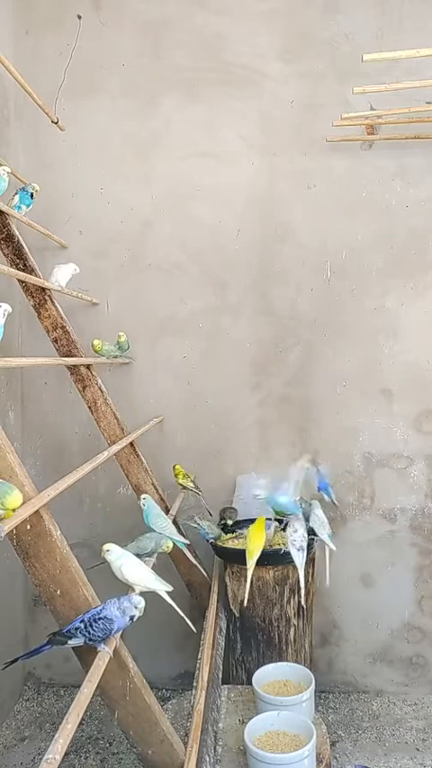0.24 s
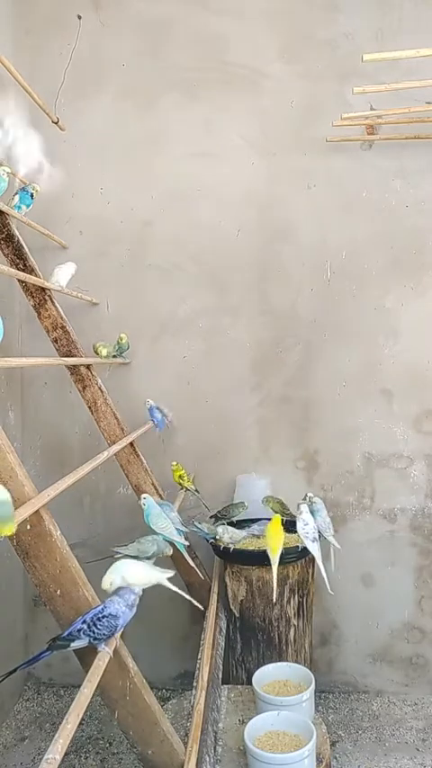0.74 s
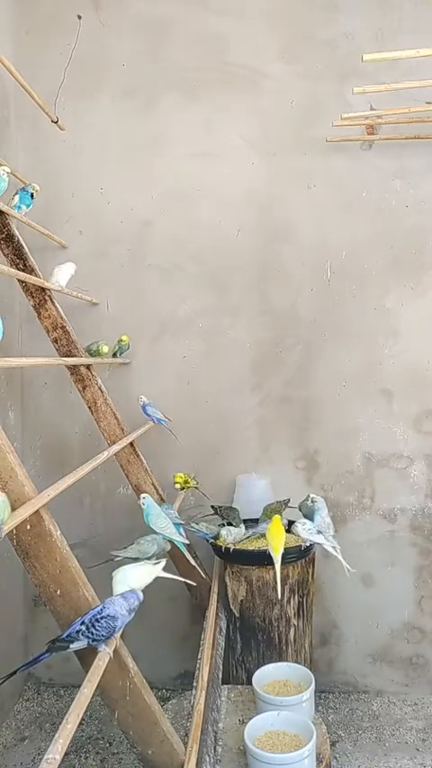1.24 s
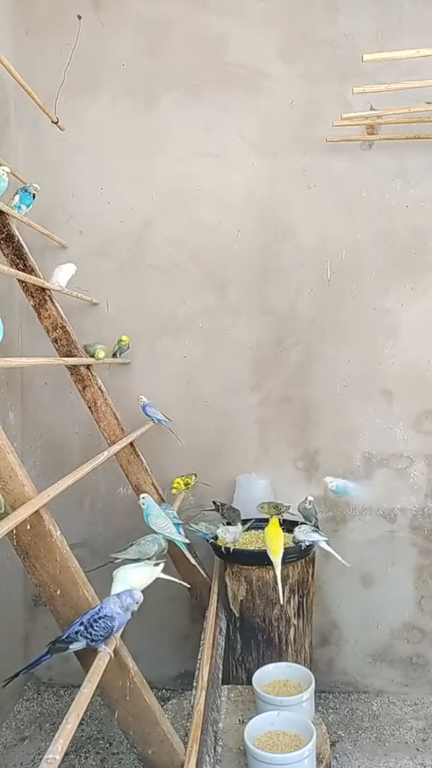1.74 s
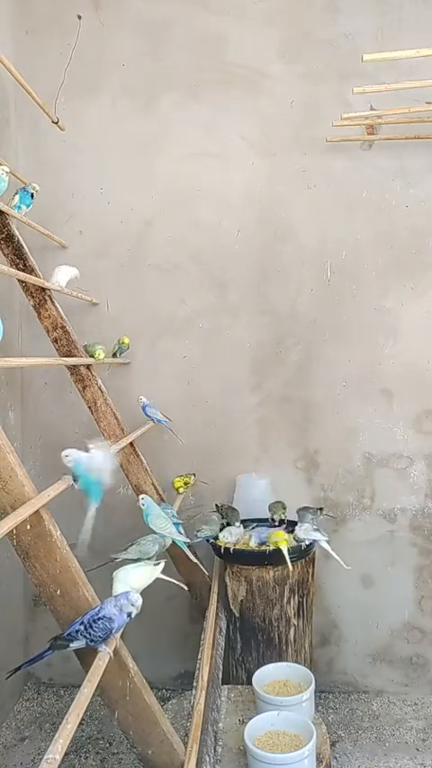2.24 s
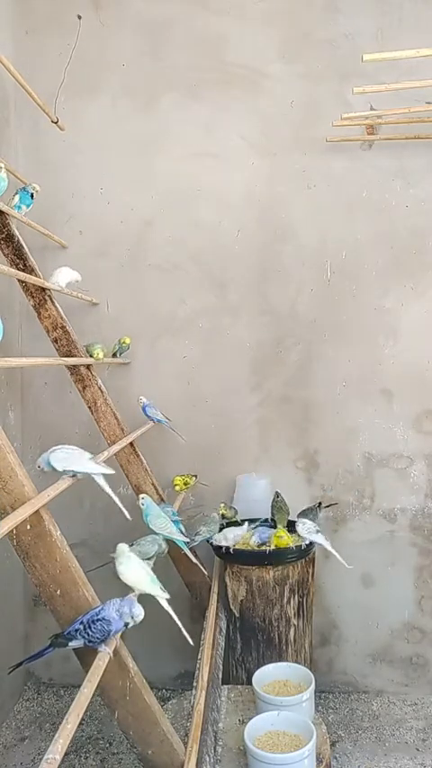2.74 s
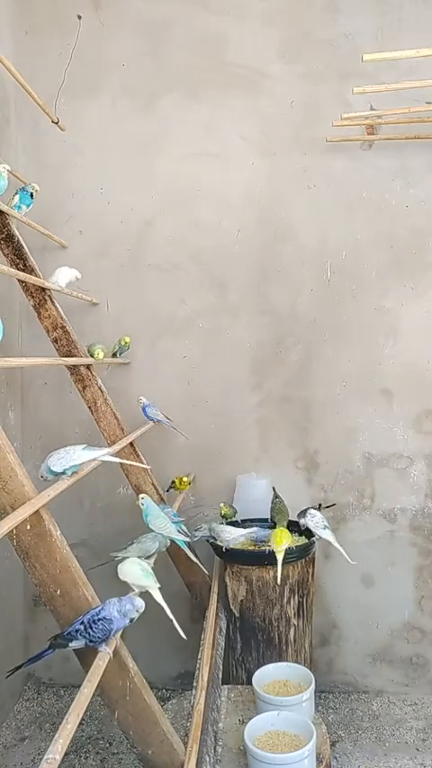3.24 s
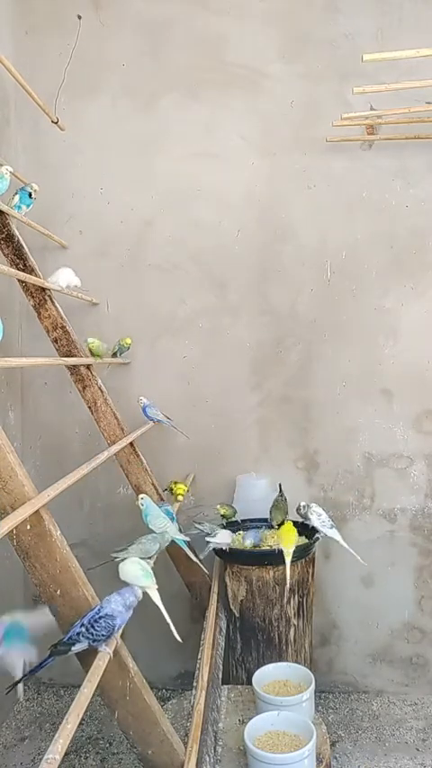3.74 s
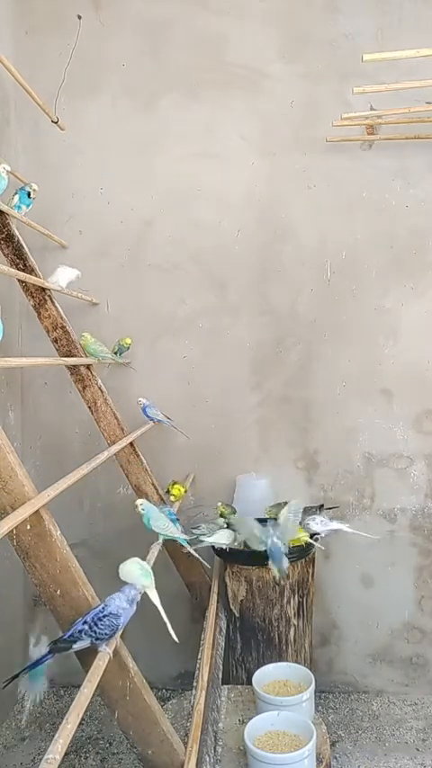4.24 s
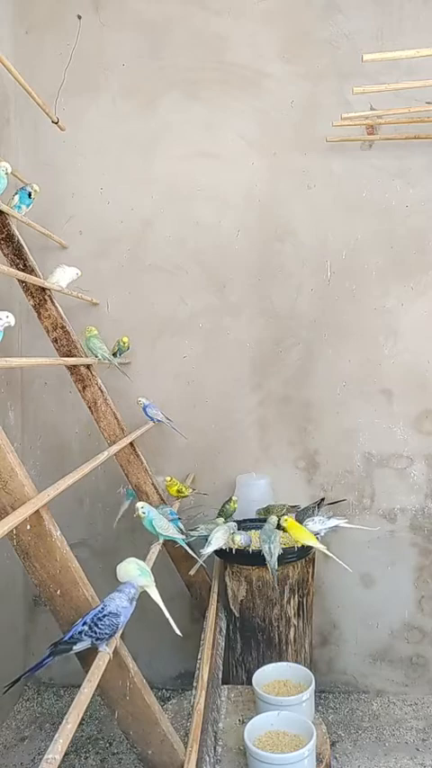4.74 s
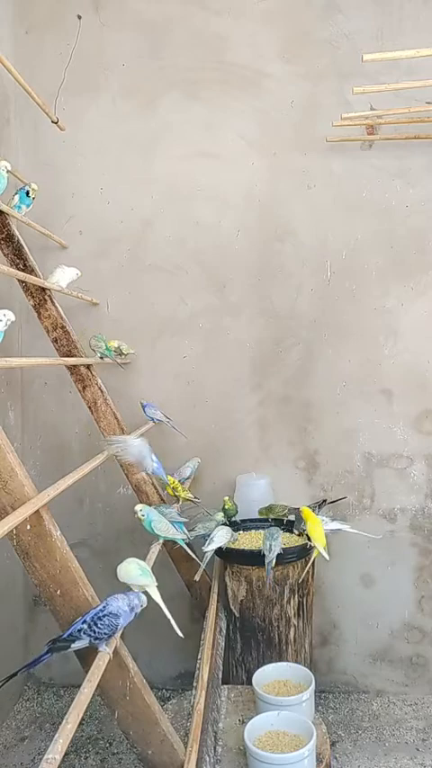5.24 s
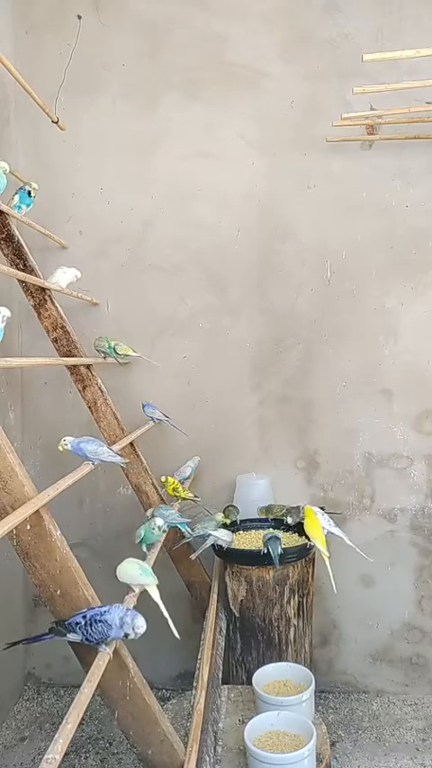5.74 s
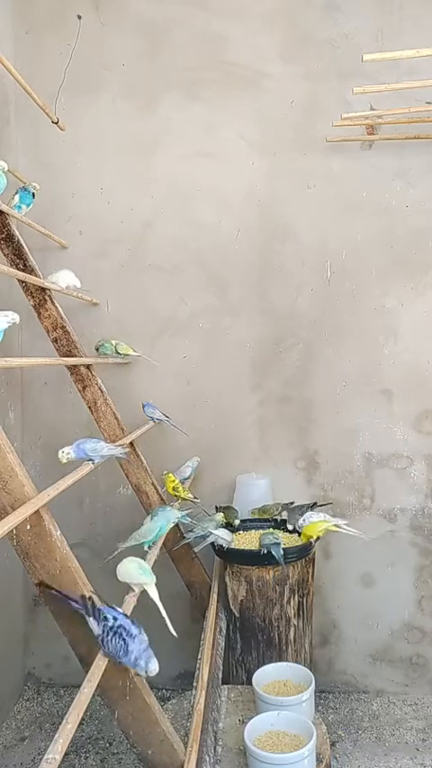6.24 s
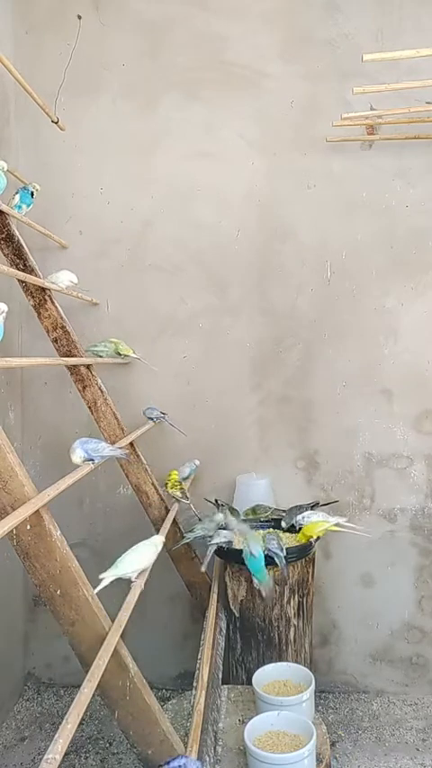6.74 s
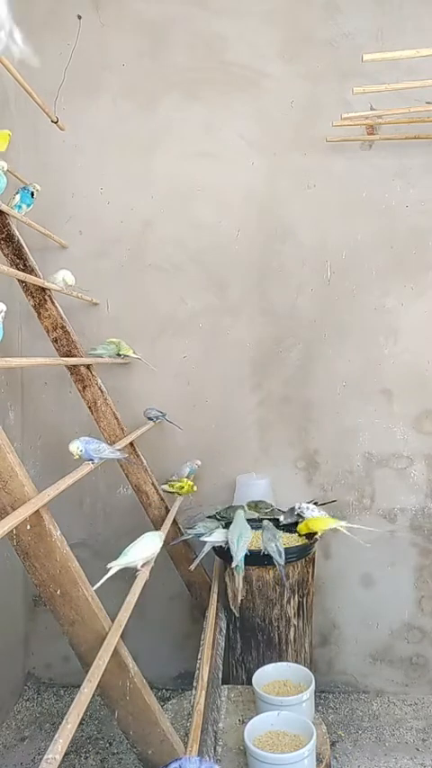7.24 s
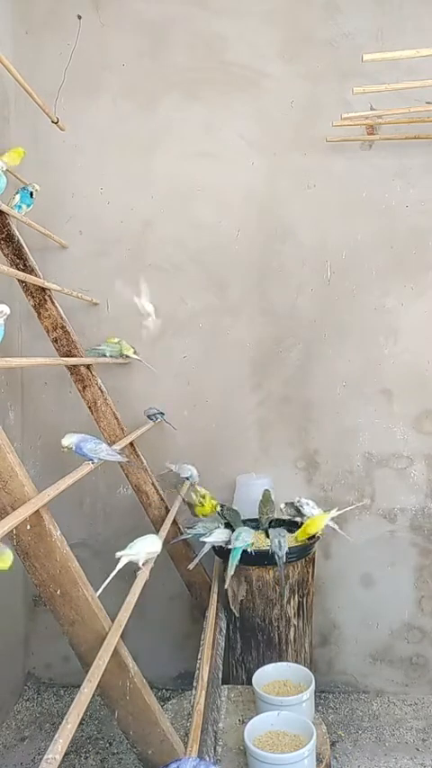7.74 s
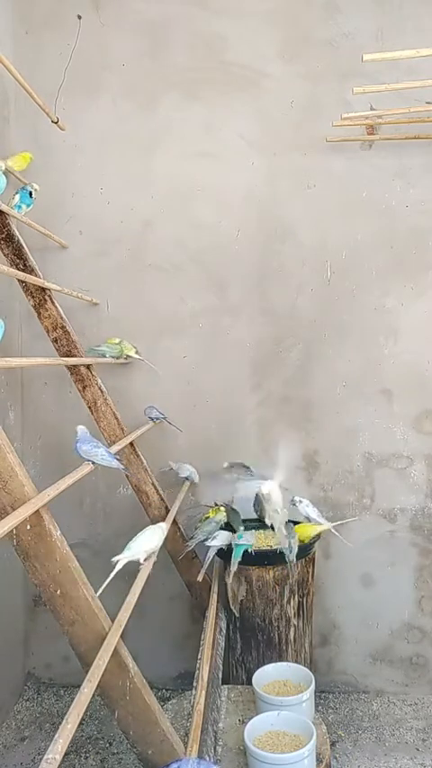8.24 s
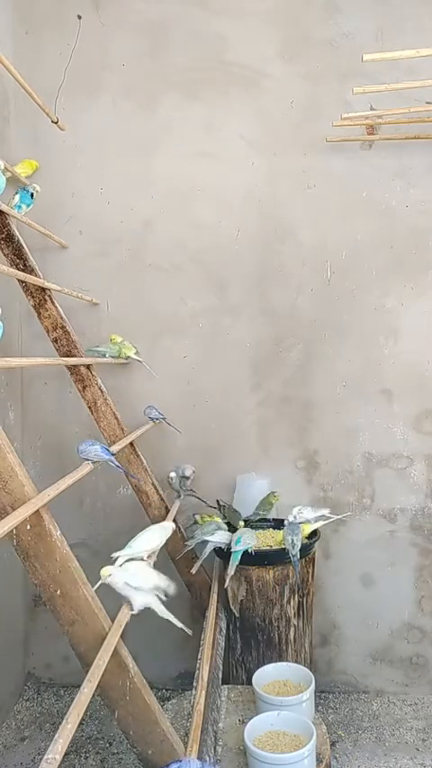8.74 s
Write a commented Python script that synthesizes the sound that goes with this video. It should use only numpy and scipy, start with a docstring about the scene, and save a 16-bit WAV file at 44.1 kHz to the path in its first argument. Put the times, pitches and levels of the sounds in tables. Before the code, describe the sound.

In a bare plastered aviary, a crowd of budgerigars chatters without pause. Near birds give clear falling contact calls, short whistled chirps and buzzy scolding rasps, while farther ones mutter and warble beneath. Wings whirr in low, soft flutters as birds take off and land. The chatter thins in the middle, then thickens again. Small beak and claw ticks. Close phone microphone, short hard-walled reverberation, slightly dull top.

```python
"""A flock of budgerigars chatters in a bare plastered aviary, close to a phone.
From the start wings whirr, as noise bands shaped by wingbeats, and near birds scold in buzzing partials and puffs.
Farther birds mutter, warble and twitter beneath, as crowds of short gliding notes that swell and sink.
Soon near birds add contact calls and chirps, made as frequency-modulated whistles with an overtone.
Later beaks and claws tick, as ringing noise bursts; the walls answer with decaying noise tails."""
import sys
import numpy as np
from scipy import signal
from scipy.fft import rfft, irfft, next_fast_len
from scipy.io import wavfile
from scipy.ndimage import uniform_filter1d, minimum_filter1d, map_coordinates

SR = 44100
rng = np.random.default_rng(int(sys.argv[2]) if len(sys.argv) > 2 else 0)


def to_wav(sig):
    """Store sig (one row per channel, or 1-D mono) as 16-bit WAV at the path in sys.argv[1].

    Samples outside -1..1 are clipped; the rate is SR.
    """
    pcm = np.clip(np.atleast_2d(sig), -1, 1) * 32767
    pcm = np.round(pcm).astype(np.int16)
    wavfile.write(sys.argv[1], SR, pcm.T)  # frames by channels


N = 395577


def amp(db):
    """Level law: decibels to amplitude gain."""
    return 10 ** (np.asarray(db) / 20)


def unit(x):
    """Normalization: x at rms 1."""
    return x / np.sqrt(np.mean(x ** 2) + 1e-20)


def along(points, hz):
    """Interpolation of (f/Hz, value) points on a logarithmic frequency axis."""
    f, v = np.transpose(points)
    return np.interp(np.log(hz + 1), np.log(f + 1), v)


def curves(rows):
    """Linear interpolation: one value per sample for each column after the time."""
    s, *cols = np.transpose(rows)
    return [np.interp(np.arange(N) / SR, s, c) for c in cols]


def wobble(rate, size):
    """Low-pass random process: a smooth curve through rate random knots a second."""
    knots = rng.standard_normal(int(size * rate / SR) + 4)
    return map_coordinates(knots, [np.arange(size) * rate / SR + 1])


def filtered(x, response):
    """Linear filtering: the spectrum of x times a response of frequency."""
    m = next_fast_len(len(x) + 8192)
    spectrum = rfft(x, m) * response(np.fft.rfftfreq(m, 1 / SR))
    return irfft(spectrum, m)[:len(x)]


def noise(spectrum):
    """Spectral shaping: white noise coloured by (f/Hz, level/dB) points, at rms 1."""
    return unit(filtered(rng.standard_normal(N), lambda hz: amp(along(spectrum, hz))))


def narrow(centre_hz, width_hz, size):
    """Quadrature modulation: narrow-band noise about a centre that may move, at rms 1."""
    phase = 2 * np.pi * np.cumsum(centre_hz) / SR
    return unit(wobble(width_hz, size) * np.cos(phase) + wobble(width_hz, size) * np.sin(phase))


def resonate(x, hz, width_hz):
    """Resonance: two equal resonators in series, width_hz each, for steeper skirts."""
    b, a = signal.iirpeak(min(hz, SR / 4), hz / width_hz, SR)
    return signal.lfilter(b, a, signal.lfilter(b, a, x))


def add(track, s, sound):
    """Superposition: mix a sound into the track at time s."""
    start = max(0, round(s * SR))
    part = track[start:start + len(sound)]
    part += sound[:len(part)]


def syllable(length, attack, release):
    """Amplitude envelope: times and outline of one syllable, with a soft start and end."""
    t = np.arange(int((length + (attack + release) / 2) * SR)) / SR
    edges = np.clip(t / attack, 0, 1) * np.clip((t[-1] - t) / release, 0, 1)
    return t, np.sin(edges * np.pi / 2) ** 2


def note(length, start_hz, middle_hz, end_hz, rough, swell=.005, overtone_db=-30, swing_hz=560, flutter_db=4):
    """Frequency modulation: a slower buzz of the syrinx membranes shakes a whistle's pitch and level."""
    t, outline = syllable(length, attack=swell + 0.026 * rough, release=0.0063)
    # a parabola through the three pitches
    arc = np.polyfit([0, .5, 1], [start_hz, middle_hz, end_hz], 2)
    glide = np.polyval(arc, np.minimum(t / length, 1))
    buzz_hz = rng.uniform(278.9, 511.0) * np.exp(0.2462 * wobble(200, len(t)))
    buzz = np.sin(2 * np.pi * np.cumsum(buzz_hz) / SR)
    shake = rough * swing_hz * (buzz + 0.7 * wobble(1000, len(t))) + 45 * wobble(160, len(t))
    phase = 2 * np.pi * np.cumsum(glide + shake) / SR
    strength = amp(flutter_db * rough * buzz + 1.7 * wobble(170, len(t)))
    whistle = np.sin(phase) + amp(overtone_db) * np.sin(2 * phase)
    return outline * unit(strength * whistle)


def flight_effort(takeoff_s=.07, easing_db_per_s=6.5, settle_db_per_s=85):
    """Power summation: thrust and whirr of all flights, and their power-weighted whirr pitch."""
    # flights: t/s, length before settling/s, air thrust level/dB, feather whirr level/dB, whirr centre f/Hz
    flights = [(-.05, 0.5655, -39, -32, 553.9), (0.546, 0.17, -42, -39, 555.1),
               (0.735, 0.12, -38.5, -35, 547.1), (1.024, .32, -53.5, -44, 554),
               (1.552, .45, -49, -41, 486.5), (2.098, .15, -51, -51.5, 587.4),
               (2.679, 0.082, -59, -51, 600), (2.88, 0.41, -54, -40, 492.3), (3.167, .52, -42, -34, 508.4),
               (3.859, 0.4044, -33, -33.5, 457.8), (4.292, 0.196, -46, -39, 440.5),
               (4.682, 0.091, -59, -46.5, 413.8), (4.898, 0.1274, -63.5, -42.5, 586),
               (5.02, 0.28, -47.5, -53, 560), (5.243, .3, -62, -38, 584.3),
               (5.621, .12, -75.5, -49.5, 567.7), (6.388, 0.16, -51, -39, 510),
               (6.602, 0.35, -49, -40.5, 490), (6.8, .38, -36, -36, 481.7),
               (7.418, .16, -50.5, -43.5, 524.7), (7.792, .3, -44, -38.5, 487.6),
               (8.12, .15, -35.5, -29.5, 460), (8.271, 0.21, -32, -27.5, 395)]
    s, length, thrust_db, whirr_db, hz = np.transpose(flights)[:, :, None]
    # perched birds ruffling their feathers
    fidget_thrust_db, fidget_whirr_db, fidget_hz = -67, -62, 550
    clock = np.arange(0, N / SR, .005)
    t = clock - s
    # a bird works less once it is airborne, then its wings die away
    fade_db = easing_db_per_s * np.clip(t, 0, length) + settle_db_per_s * np.maximum(t - length, 0)
    effort = np.clip(t / takeoff_s, 0, 1) * amp(-fade_db)
    thrust_power = np.sum((effort * amp(thrust_db)) ** 2, axis=0) + amp(fidget_thrust_db) ** 2
    each = (effort * amp(whirr_db)) ** 2
    fidget = amp(fidget_whirr_db) ** 2
    whirr_power = each.sum(axis=0) + fidget
    pitch = (np.sum(each * hz, axis=0) + fidget * fidget_hz) / whirr_power
    return curves(np.column_stack([clock, np.sqrt(thrust_power), np.sqrt(whirr_power), pitch]))


def wings(beat_hz=17, beat_db=1.5):
    """Amplitude modulation: wingbeats push air and brush the feathers, which also whirr in a narrow band."""
    # spectrum of the pushed air: f/Hz, relative level/dB
    thrust_spectrum = [(20, -36.5), (48, -11), (66, -9), (88, -4), (103, 6), (130, -16), (160, -7.5),
                       (230, -17.5), (400, -21), (900, -84)]
    # spectrum of the brushed feathers: f/Hz, relative level/dB
    feather_spectrum = [(120, -35.5), (280, -12.5), (390, -1), (520, 5.5), (700, -3.5), (1000, -8),
                        (2000, -16), (6000, -40.5), (9000, -76.5)]
    thrust, brush, whirr_hz = flight_effort()
    beats = np.sin(2 * np.pi * np.cumsum(beat_hz * np.exp(0.24 * wobble(18, N))) / SR)
    stroke = unit(amp(beat_db * beats))
    hum = amp(-5.0) * narrow(whirr_hz, width_hz=87, size=N)
    rustle = amp(-2.0) * stroke * noise(feather_spectrum)
    return thrust * np.sqrt(stroke) * noise(thrust_spectrum) + brush * (hum + rustle)


def scold_syllables(period_s=0.061, step_down_db=0.02, wander=0.02382):
    """Periodic repetition: one syllable or several evenly spaced, nearly steady in level, wandering in pitch."""
    # scolding runs: t/s, syllables, syllable length/s, lower partial f/Hz, its level/dB,
    # upper partial f/Hz, its level/dB, harshness (0-1); levels before the mix
    runs = [(0, 1, 0.068, 3220, -27.5, 5560, -28, 0.98), (0.129, 2, 0.035, 2900, -20.5, 5370, -24.5, .6),
            (0.34, 2, 0.068, 2923, -20, 4860, -30.5, .85), (0.622, 1, 0.058, 3367, -26, 5410, -28.5, 1),
            (0.727, 1, 0.024, 3600, -45, 4760, -25, .4), (1.269, 2, .05, 3100, -30.5, 4750, -55, .9),
            (1.58, 1, 0.036, 2700, -30.5, 4680, -38, 1), (2.031, 1, .04, 2694, -28.5, 4790, -29, .9),
            (2.155, 1, 0.026, 3056, -20.5, 4650, -27.5, .9), (2.313, 3, 0.044, 2570, -35, 4980, -24.5, .6),
            (2.654, 1, .045, 2644, -14, 5335, -9.5, .25), (2.716, 2, .046, 2910, -20, 5554, -13, .45),
            (2.86, 3, 0.041, 2990, -24, 5985, -12, 0.5), (3.093, 1, 0.044, 2570, -22, 5220, -16.5, .3),
            (3.299, 1, 0.055, 2600, -30.5, 6180, -31, .7), (4.553, 2, 0.048, 2880, -35, 4700, -64.5, 0.83),
            (4.789, 1, 0.069, 3340, -23.5, 4880, -23.5, 0.7),
            (5.161, 1, 0.019, 2516, -28, 4930, -29.5, 0.2), (5.404, 1, 0.012, 2784, -22, 4504, -34.5, .7),
            (5.449, 2, 0.013, 2650, -23.5, 5800, -30.5, .25), (5.575, 1, .042, 3390, -19, 5160, -21, 0.8),
            (5.628, 2, 0.061, 3320, -23, 4700, -36.5, 1), (5.772, 1, 0.0049, 3005, -9.5, 5770, -9.5, 1),
            (5.85, 1, 0.051, 3020, -15, 5490, -12, 0.7), (5.945, 1, 0.075, 2890, -19.5, 6270, -16.5, .75),
            (6.148, 1, .055, 3065, -13.5, 5680, -12, 0.7), (6.36, 1, 0.071, 2980, -16.5, 6020, -11.5, .9),
            (6.464, 4, 0.074, 3337, -22.5, 5780, -16, .95), (6.793, 1, 0.06, 3100, -22.5, 6250, -14.5, .7),
            (7.641, 1, 0.056, 3050, -19, 5940, -17.5, 0.7), (7.761, 1, 0.06, 3083, -16.5, 5005, -18.5, .9),
            (7.961, 3, 0.022, 3053, -20.5, 6260, -16, .5), (8.423, 1, 0.055, 3326, -16.5, 4480, -29, 1),
            (8.509, 1, 0.049, 3593, -17, 5360, -12.5, 1), (8.624, 1, 0.038, 3304, -16.5, 5650, -12.5, 0.8),
            (8.792, 1, 0.046, 3422, -22, 5050, -19.5, .7), (8.932, 1, .067, 3160, -18.5, 5020, -17, .7)]
    for s, count, length, low_hz, low_db, high_hz, high_db, harsh in runs:
        for k in range(round(count)):
            pitch = np.exp(wander * rng.uniform(-1.03, 1))
            drop_db = step_down_db * k
            low = low_hz * pitch, low_db - drop_db
            high = high_hz * pitch, high_db - drop_db
            yield s + k * period_s, length, low, high, harsh


def rasps(pulse_hz=340, jitter=.3, hiss=0.64, chaos_hz=620, puff_share=0.62):
    """Source and filter: two lurching partials break into uneven resonant puffs as harshness grows."""
    # what throat and beak pass: f/Hz, gain level/dB
    vocal_response = [(300, -48), (1000, -33.5), (1500, -6), (1900, 0.5), (3500, 2), (4300, 3),
                      (5300, -0.5), (6800, -4), (7500, -13.5)]
    out = np.zeros(N)
    for s, length, low, high, harsh in scold_syllables():
        attack = .016 + .024 * harsh  # harsh calls swell more slowly
        t, outline = syllable(length, attack, release=0.0099)
        cycles = np.cumsum(pulse_hz * np.exp(jitter * wobble(250, len(t)))) / SR
        puffs = unit(np.diff(np.floor(cycles), prepend=0)) + hiss * rng.standard_normal(len(t))
        buzz = np.sin(2 * np.pi * cycles)
        broken = np.clip(puff_share * harsh, 0, 1)
        outline = outline * unit(amp(2.3 * wobble(150, len(t))))
        for hz, db in (low, high):
            sway = 0.87 * buzz + 0.5904 * wobble(190.25, len(t)) + 0.61 * wobble(1200, len(t))
            phase = 2 * np.pi * np.cumsum(hz + harsh * chaos_hz * sway) / SR
            shrill = unit(amp(0.53 * buzz) * np.sin(phase))
            crackle = unit(resonate(puffs, hz, width_hz=2080))
            blend = np.sqrt(1 - broken) * shrill + np.sqrt(broken) * crackle
            add(out, s - attack / 2, amp(db) * outline * blend)
    return filtered(out, lambda hz: amp(along(vocal_response, hz)))


def warble(centre_hz, spread, rough, count):
    """Random superposition: many short notes of scattered time, pitch, glide and level, at rms 1."""
    out = np.zeros(N)
    for k, (when, span, pitch, bend, fall, size) in enumerate(rng.uniform(-1, 1, (count, 6))):
        hz = centre_hz * np.exp(spread * pitch)
        length = .028 * np.exp(.55 * span)
        sound = note(length, hz * np.exp(0.1435 * bend), hz, hz * np.exp(.14 * fall), rough)
        add(out, (k + when) / count * N / SR, amp(2 * size) * sound)
    return unit(out)


def far_level(rows, limit_db=-23.5):
    """Level addition: one far voice's gain, capped by distance, then sinking in the lulls that all share."""
    # lulls, when the far birds fall quiet together: centre t/s, half width to 1/e of the dip/s, level/dB
    lulls = [(0.089, 0.024, -4.5), (1.5, .03, -11), (2.559, 0.091, -7.5), (3.22, 0.048, -1),
             (3.81, 0.045, -14), (4.281, 0.053, -22), (5.26, 0.072, -5), (6.098, 0.047, -13),
             (6.52, .1, -6), (8.741, 0.09, -26)]
    t = np.arange(N) / SR
    lull_db = sum(db * np.exp(-((t - s) / width) ** 2) for s, width, db in lulls)
    return amp(np.minimum(curves(rows)[0], limit_db) + lull_db)


def flock(warble_db=-1.0, mutter_db=0, twitter_db=1):
    """Band superposition: farther birds mutter low, warble in the middle and twitter above."""
    # the far flock's warble, before the distance cap: t/s, level/dB
    warble_rows = [(0.0, -30), (0.2, -30), (0.35, -22.5), (0.82, -29.5), (1.5, -32), (2.8, -20.5),
                   (3.92, -48.5), (4.07, -24), (4.19, -49), (4.4, -37), (4.77, -31.5), (5.4, -31),
                   (5.79, -27), (6.32, -9.5), (7.45, -35), (7.67, -26), (7.79, -28), (7.97, -11),
                   (8.22, -32.5), (8.59, -20.5), (8.74, -21), (8.97, -43)]
    # its low mutter, before the distance cap: t/s, level/dB
    mutter_rows = [(0.0, -34), (0.35, -39), (0.6, -25.5), (0.7, -37.5), (1.55, -29), (2.72, -40.5),
                   (3.32, -38), (3.37, -42), (3.82, -73), (4.0, -33), (4.32, -41.5), (4.45, -32.5),
                   (5.5, -59.5), (5.57, -38), (6.64, -47.5), (6.85, -29), (6.87, -48.5), (7.22, -31),
                   (7.39, -48.5), (7.77, -45), (7.79, -31), (8.57, -37), (8.67, -42), (8.97, -41)]
    # its high twitter, before the distance cap: t/s, level/dB
    twitter_rows = [(0.0, -32.5), (0.62, -34.5), (1.0, -66), (1.87, -51.5), (2.25, -41), (2.7, -45.5),
                    (2.85, -17), (2.97, -12), (3.49, -56.5), (4.52, -53), (4.8, -45), (5.52, -48.5),
                    (5.84, -27.5), (6.27, -45), (6.57, -17), (6.75, -15.5), (7.22, -46.5), (7.52, -39.5),
                    (7.87, -24.5), (8.42, -43.5), (8.59, -31), (8.97, -54)]
    middle = far_level(warble_rows) * warble(centre_hz=2520, spread=.4, rough=.3, count=500)
    low = far_level(mutter_rows) * warble(centre_hz=1376.5, spread=.32, rough=.2, count=440)
    high = far_level(twitter_rows) * warble(centre_hz=4940, spread=.24, rough=.35, count=440)
    return amp(warble_db) * middle + amp(mutter_db) * low + amp(twitter_db) * high


def chirp(length, hz, glide, rough, arch=0.0331, swell_s=0.0059):
    """Frequency glide: a note changes by glide octaves, its middle pitch arch octaves above hz."""
    start_hz, end_hz = hz * 2 ** (-glide / 2), hz * 2 ** (glide / 2)
    return note(length, start_hz, hz * 2 ** arch, end_hz, rough, swell=min(swell_s, length / 3))


def chirps():
    """Time and pitch scaling: near contact calls are forms of one shape, joined by single chirps."""
    # contact calls: t/s, stretch in time, pitch f/Hz, factor on the second note's pitch,
    # level before the mix/dB, roughness (0-1)
    contact_calls = [(.138, 0.82, 3006, 1.17, -16, 0.56), (.308, 1.2, 3180, 0.93, -12, .8),
                     (2.233, 1.03, 3026, 1.15, -13.5, .35), (3.894, 1.05, 3044, 1.08, -14, 0.61),
                     (6.212, 1.15, 3047, 1.06, -15, 0.22), (7.145, 0.37, 3165, 1.02, -18, 0.18),
                     (7.882, 0.72, 2978, 1.16, -16.5, 0.8)]
    # the shared call, two high notes and a falling slur: delay before stretch/s, length before stretch/s,
    # start, middle and end pitch over the call's pitch, relative level/dB, share of the call's roughness
    call_shape = [(0, .037, .94, 1.03, 1.02, 0, .15), (.041, .06, 1.01, 1.01, .99, -1.5, .3),
                  (.068, .048, .86, .8, .73, -2.5, .85), (.108, .038, .68, .6, .57, -6, .2)]
    # single chirps: t/s, length/s, pitch before the arch f/Hz, glide/octaves,
    # level before the mix/dB, roughness (0-1)
    single_chirps = [(0.394, 0.042, 3222, -0.069, -13.5, 0.22), (0.535, 0.047, 2755, -0.17, -18, 0.65),
                     (0.581, 0.046, 3480, -0.29, -20.5, 0.57), (0.638, 0.034, 3470, -0.11, -17, 0.5),
                     (0.846, 0.031, 3170, -0.069, -21.5, 0.43), (0.884, 0.018, 3143, 0, -15, 0.09),
                     (1.085, .027, 3180, -.05, -27, 0), (1.204, 0.033, 2187, .55, -23, 0.6),
                     (1.263, 0.021, 1860, -0.031, -21.5, 0.16), (1.395, 0.027, 1660, -0.34, -29.5, 0.14),
                     (1.55, 0.039, 2847, 0.34, -19, 0.3), (1.575, 0.051, 2012, -0.078, -18, 0.31),
                     (2.268, 0.013, 2027, -0.25, -14, 0.05), (2.374, 0.056, 2580, -0.093, -17.5, 0.03),
                     (2.451, 0.03, 2650, 0.013, -21, 0.26), (2.522, 0.023, 3640, -0.15, -27, 0.16),
                     (2.583, 0.034, 2985, .05, -19.5, 0.38), (3.256, 0.03, 2756, -0.41, -23.5, 0.49),
                     (3.28, 0.038, 3334, -0.38, -16.5, 0.47), (3.317, 0.043, 2730, -0.44, -21.5, 0.48),
                     (3.347, 0.12, 1274, -0.081, -33, 0), (3.385, 0.05, 2467, 0, -30, .1),
                     (3.547, 0.031, 2610, -.25, -30.5, 0.16), (3.583, 0.043, 3140, -0.14, -29, 0.25),
                     (3.877, 0.017, 3370, -.1, -27.5, 0.33), (3.938, 0.059, 2126, -0.24, -18.5, 0.5),
                     (4.686, 0.013, 4430, 0.013, -19.5, 0.1), (4.95, 0.017, 3650, .05, -28.5, 0.1),
                     (5.184, .022, 4580, -0.04, -26.5, 0.36), (5.251, 0.011, 4710, 0.2, -25.5, 0.05),
                     (5.44, 0.013, 3270, 0.19, -23, 0.06), (5.505, 0.013, 3380, -.1, -23, 0.03),
                     (5.5, 0.013, 2060, 0.055, -29, 0.14), (5.567, 0.0091, 1873, .15, -17, 0.07),
                     (5.702, 0.038, 3750, -0.042, -20, 0.4), (5.77, 0.063, 3220, -0.31, -19.5, .5),
                     (5.836, 0.028, 3104, -0.079, -14, 0.08), (6.084, 0.017, 3680, -0.06, -21.5, 0.25),
                     (6.106, .045, 2730, -.15, -18.5, 0.14), (6.25, .039, 2936, .4, -14.5, 0.1),
                     (6.316, 0.028, 2544, -.12, -16.5, 0.11), (6.841, 0.037, 3320, 0, -22.5, 0.02),
                     (6.966, 0.033, 2500, 0.085, -26.5, 0.14), (7.37, 0.065, 2528, 0.035, -30, 0.13),
                     (7.448, .04, 3400, -0.24, -26.5, 0.18), (7.617, 0.042, 2523, -0.077, -18.5, .05),
                     (7.703, 0.045, 2760, 0.33, -17.5, 0.11), (7.763, 0.017, 2435, -0.087, -18.5, 0),
                     (7.863, 0.026, 2350, -.6, -18.5, 0.42), (7.981, 0.018, 1840, -0.044, -27, 0),
                     (8.04, 0.025, 3290, 0.15, -18, 0.22), (8.059, 0.024, 2985, 0, -11, 0.22),
                     (8.097, 0.018, 2460, 0.14, -11.5, 0), (8.123, 0.062, 2187, -0.74, -22.5, 0.66),
                     (8.387, .036, 2800, -0.27, -16, 0.39), (8.415, 0.033, 2780, .3, -21, 0.43),
                     (8.636, .014, 2520, -0.92, -18, 0.02), (8.896, 0.032, 3050, .4, -21.5, 0.2)]
    out = np.zeros(N)
    for s, stretch, call_hz, step, db, rough in contact_calls:
        for k, (delay, length, start, middle, end, note_db, share) in enumerate(call_shape):
            hz = call_hz * step if k == 1 else call_hz
            sound = note(stretch * length, hz * start, hz * middle, hz * end, rough * share)
            add(out, s + stretch * delay, amp(db + note_db) * sound)
    for s, length, hz, glide, db, rough in single_chirps:
        add(out, s - .004, amp(db) * chirp(length, hz, glide, rough))
    return out


def ticks(t60=0.028, reach=1.47):
    """Damped resonance: bursts ring briefly; the wooden perches dull what lies far above the ring."""
    # ticks of beaks and claws, and at 5.5 s the sharp onset of a short chirp:
    # t/s, relative level/dB, ring f/Hz
    taps = [(1.3471, -16, 2117), (1.8312, -12, 2670), (1.84, -25, 2680), (3.682, -23, 2820),
            (4.109, -6, 3440), (4.743, -36.5, 4450), (4.8881, -18, 2320), (5.073, -16, 2530),
            (5.5015, -28.5, 3370), (6.931, -26, 1830), (7.1193, -12.5, 3394), (8.1747, -19, 1560),
            (8.372, -14, 3120)]
    out, t = np.zeros(N), np.arange(SR // 10) / SR
    for s, db, hz in taps:
        ring = resonate(rng.standard_normal(len(t)), hz, width_hz=2900)
        b, a = signal.butter(6, min(reach * hz, SR / 3), fs=SR)
        ring = unit(signal.lfilter(b, a, ring))
        outline = amp(-60 * t / t60) * (1 - np.exp(-t / 0.0022))
        add(out, s, amp(db - 6.0) * ring * outline / outline.max())
    return out


def walls(x, uneven=0.31):
    """Reverberation by convolution: overlapping half-second pieces each meet a new decaying noise tail."""
    # decay of the bare walls before the scatter between bands: f/Hz, T60/s
    decay_times = [(100, 0.17), (500, 0.53), (2500, 0.34), (5000, 0.34), (8000, 0.34)]
    out, hop = np.zeros(N), SR // 4
    # each narrow band has its own decay time, so some pitches linger
    linger = np.exp(uneven * np.clip(rng.standard_normal((257, 1)), -2, 2))
    for start in range(0, N, hop):
        hz, t, z = signal.stft(rng.standard_normal(SR // 2), SR, nperseg=512)
        decay = amp(-60 * t / (linger * along(decay_times, hz)[:, None]))
        tail = signal.istft(z * decay, SR, nperseg=512)[1]
        tail = tail / np.linalg.norm(tail)
        piece = x[start:start + 2 * hop] * np.hanning(2 * hop)[:N - start]
        add(out, start / SR + .004, signal.fftconvolve(piece, tail))
    return out


def scene():
    """Direct and reverberant fields: the far flock is weaker in the direct sound than in the room's."""
    # spectrum of the still air: f/Hz, relative level/dB
    air_spectrum = [(20, 0.5), (100, -2.5), (250, -8), (500, -6.5), (2000, -16.5), (6000, -25),
                    (9000, -61.5)]
    calls, scolding, taps, far = chirps(), rasps(), ticks(), flock()
    direct = amp(-2.0) * calls + amp(-2.5) * scolding + amp(1.5) * taps + amp(-6) * far
    room = walls(amp(-2.5) * calls + amp(-2.0) * scolding + amp(2.5) * taps + amp(-2.5) * far)
    return direct + room + wings() + amp(-59) * noise(air_spectrum)


def record(dry, ceiling=.92, top_hz=7160):
    """Limiting and low-pass filtering: the phone ducks the highest peaks and cuts steeply above top_hz."""
    needed = 1 / np.maximum(np.abs(dry) / ceiling, 1)
    gain = uniform_filter1d(minimum_filter1d(needed, size=400), size=400)
    return filtered(dry * gain, lambda hz: 1 / np.sqrt(1 + (hz / top_hz) ** 140))


dry = scene()
out = record(dry)
to_wav(out)
```